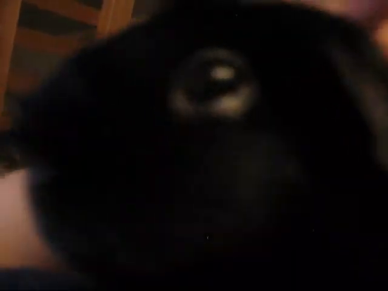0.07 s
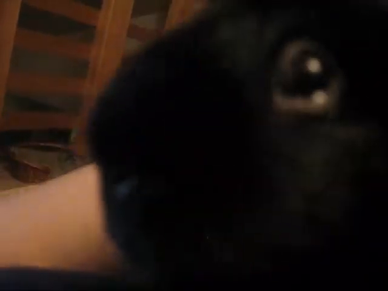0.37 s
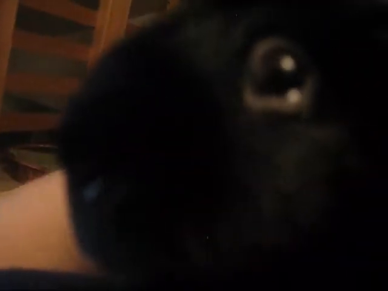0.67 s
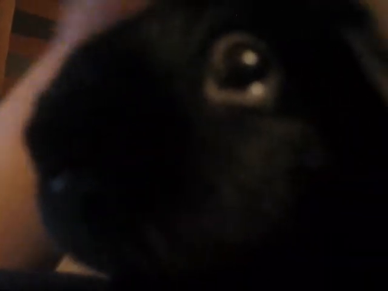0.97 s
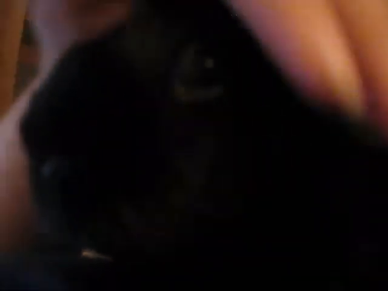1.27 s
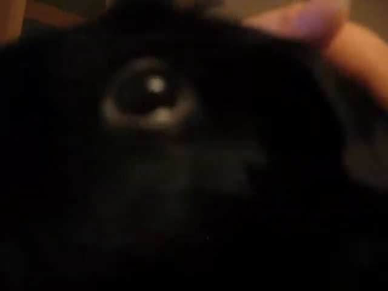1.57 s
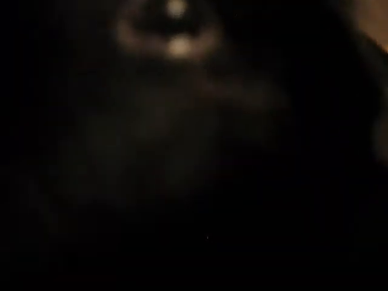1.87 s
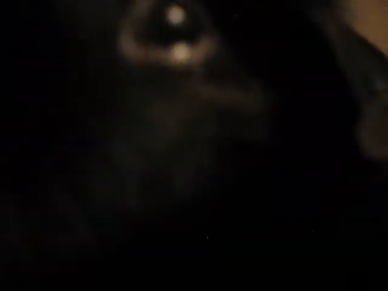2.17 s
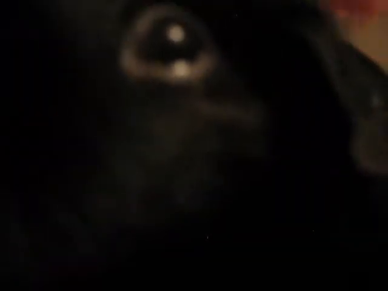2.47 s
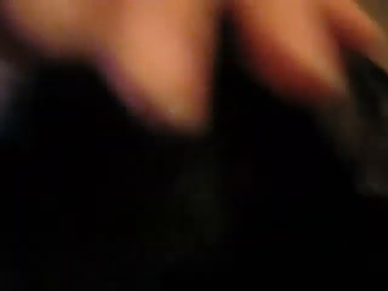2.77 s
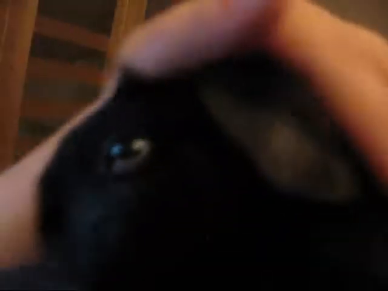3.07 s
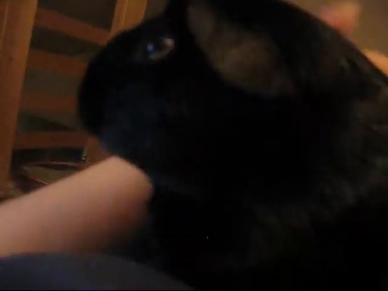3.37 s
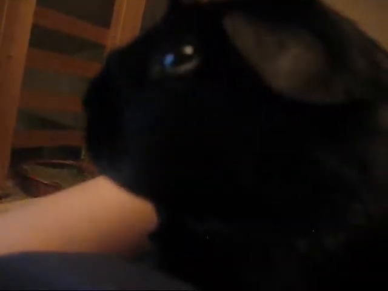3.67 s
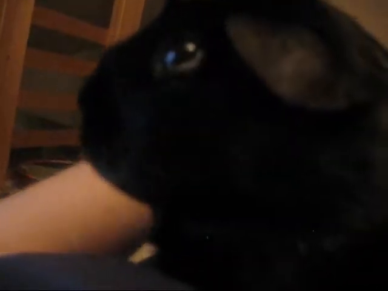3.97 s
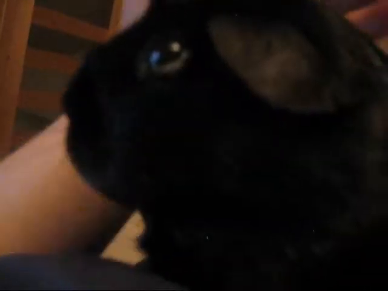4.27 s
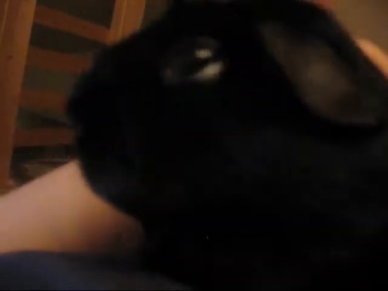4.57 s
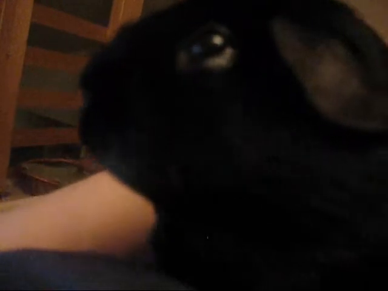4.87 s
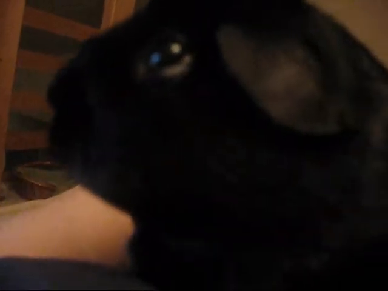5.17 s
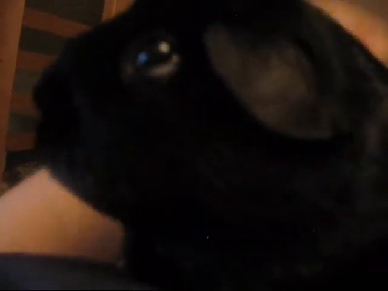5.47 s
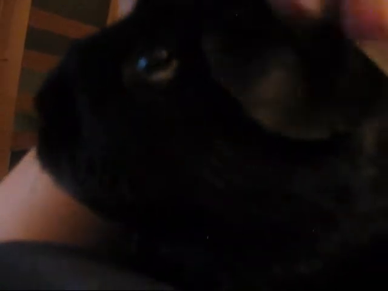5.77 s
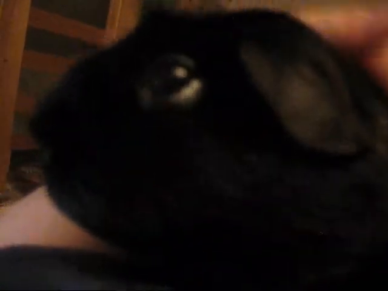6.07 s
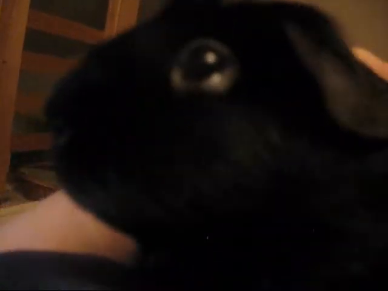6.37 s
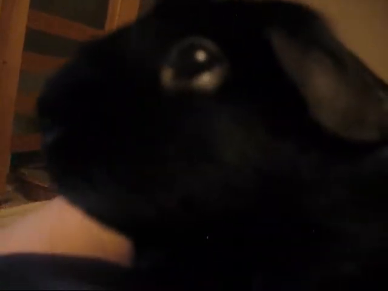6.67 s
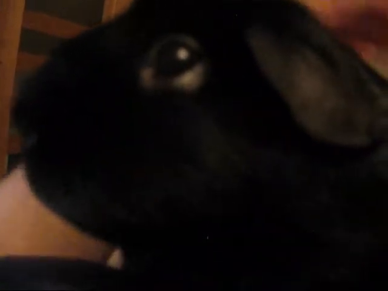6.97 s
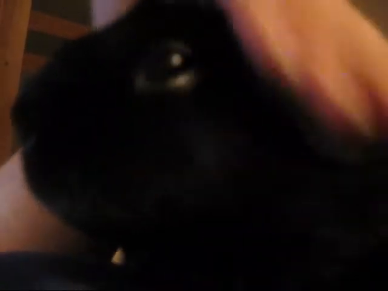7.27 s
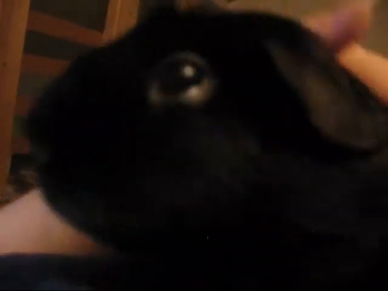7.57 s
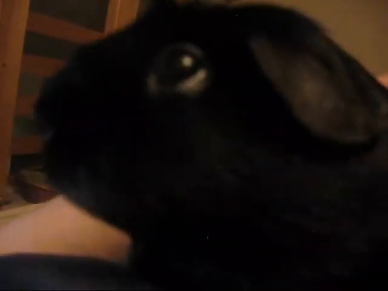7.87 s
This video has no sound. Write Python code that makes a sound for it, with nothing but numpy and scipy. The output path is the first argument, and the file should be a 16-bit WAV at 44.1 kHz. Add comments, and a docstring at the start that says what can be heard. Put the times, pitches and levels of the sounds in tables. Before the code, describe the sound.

In a quiet room, a small camera picks up a guinea pig close by, squeaking in brief bursts with pauses between them. Each squeak has a thin metallic sheen. Soft brushes of a hand on fur come and go, one small hard click sounds partway through, and faint motor whirrs and a slight cloth rustle follow. Microphone hiss and a faint whine run underneath.

```python
"""Guinea pig on a lap

A guinea pig chirps in short clusters close to a small camera while a hand strokes its fur.
Something hard clicks once, and an arm shifts on cloth. Under it all lie a quiet room, mains hum and
the camera's own hiss, whine and brief whirrs. The camera samples slowly and holds each sample,
which gives every chirp a thin metallic sheen."""
import sys
import numpy as np
from scipy import signal
from scipy.fft import rfft, irfft, next_fast_len
from scipy.io import wavfile
from scipy.ndimage import map_coordinates

SR = 44100
rng = np.random.default_rng(int(sys.argv[2]) if len(sys.argv) > 2 else 0)


def store_wav(level_fs):
    """Save 16-bit WAV to argv[1]."""
    pcm = np.round(np.clip(np.atleast_2d(level_fs), -1, 1) * 32767)
    wavfile.write(sys.argv[1], SR, pcm.T.astype(np.int16))


N = 358533

# Colour of the room and microphone hiss. Each row: frequency in Hz, relative level in dB.
HISS_EQ = [(20, -14.5), (120, -11), (300, -7.5), (670, -11), (1100, -10), (1450, -13), (2490, -16),
           (5400, -17.5)]
# Colour of the low rumble. Each row: frequency in Hz, relative level in dB.
RUMBLE_EQ = [(10, -3), (25, 3), (35, -19), (50, 2), (65, -14), (100, -12), (200, -40)]
# Mains hum and electronic whine. Each row: frequency in Hz, rms level in dB.
HUM_AND_WHINE = [(50, -61), (100, -66), (150, -64), (1077, -64), (2520, -62), (3145, -68), (3176, -66.5)]
# The hand sliding over fur. Each row: middle in seconds, length in seconds, level in dB.
FUR_STROKES = [(.01, 0.085, -42.5), (.55, 0.86, -51), (1.514, 0.3, -42.5), (2.966, 0.27, -45),
               (3.204, .18, -43.5), (5.969, 0.054, -42.5), (7.385, 0.12, -38.5), (7.6, 0.38, -49)]
# Colour of the fur. Each row: frequency in Hz, relative level in dB.
FUR_EQ = [(500, -7), (1500, -5), (2800, -6.5), (3500, -2), (4400, 1), (5500, -1)]
# The animal's calls. Each row: start in seconds, length in seconds, level in dB,
# mid-call pitch in Hz, even glide across the call in Hz, closing flick in Hz.
CALLS = [(0.0722, 0.012, -22, 957, 190, 0), (0.1295, 0.02, -21.5, 800, 143, 37),
         (0.191, 0.019, -22.5, 767, 40, 0), (1.559, 0.04, -18, 902, -1, 52),
         (1.6331, .029, -18.5, 830, 64, -39), (1.8863, .016, -29.5, 686, -12, 0),
         (3.1997, 0.016, -20.5, 976, 107, 0), (3.254, 0.015, -19.5, 792, -140, 0),
         (3.425, 0.013, -27, 536, 150, 0), (3.439, .062, -21, 824, 145, -110),
         (3.7996, .018, -25, 792, 100, -2), (3.88, 0.021, -30.5, 658, 95, 0),
         (4.889, 0.076, -23.5, 880, 144, 78), (4.993, .032, -22.5, 729, -105, 190),
         (5.07, 0.039, -21.5, 761, -175, 205), (5.3339, 0.016, -37.5, 700, 130, 0),
         (5.441, 0.026, -25, 716, 29, -60), (6.119, 0.027, -29.5, 756, 93, 0),
         (6.154, .018, -19.5, 950, 330, 50), (6.2126, .027, -19, 837, -4, 2),
         (6.439, 0.066, -18, 832, 6, 502), (6.542, 0.049, -19.5, 688, -160, 397),
         (6.648, 0.014, -34, 575, -45, 0), (7.437, .02, -27, 708, 160, 0), (7.509, 0.042, -23, 790, 205, 0),
         (7.5795, 0.054, -19.5, 749, 3, -125), (7.662, 0.019, -29, 470, -220, 0),
         (7.82, .019, -39.5, 605, 348, 0), (7.929, 0.057, -24, 682, 22, 472),
         (8.0213, 0.024, -26, 609, 85, 6)]
# The throat's resonance on the second harmonic. Each row: frequency in Hz, gain in dB.
THROAT_EQ = [(1100, 4.5), (1500, 0), (1700, 0), (1950, -2), (2400, -11)]
# Overtones against the fundamental, before each call shapes them.
# Each row: scene time in seconds, second harmonic in dB, third harmonic in dB.
OVERTONE_MIX = [(.1, -18.5, -26), (1.6, -19.5, -26), (3.2, -14.5, -27), (3.6, -10, -37),
                (6.3, -12.5, -31.5), (8, -10.5, -30)]
# The room's tail. Each row: frequency in Hz, time to fall 60 dB in seconds.
ROOM_DECAY = [(200, 0.42), (1000, 0.22), (5000, 0.033)]
# The click: its hit, a quick second hit, and a faint echo about 7 ms later. Each row: start in seconds, level
# in dB.
CLICK_ARRIVALS = [(3.5145, -3.5), (3.517, -18), (3.522, -22)]
# The hard object's ring. Each row: frequency in Hz, level in dB, time to fall 60 dB in seconds.
CLICK_RING = [(1230, -9.5, 0.013), (1790, -2.5, 0.017), (2320, -18, 0.0076), (4220, -11, 0.0041)]
# Whirrs, probably the focus motor. Each row: start in seconds, length in seconds, rms level in dB.
MOTOR_RUNS = [(3.6, .22, -56), (4.425, 0.14, -52.5), (4.545, 0.46, -47.5), (5.02, 0.2, -55),
              (5.425, .22, -52.5), (5.639, .17, -47), (5.956, 0.095, -49.5)]
# The motor housing's resonances. Each row: centre in Hz, width in Hz, relative level in dB.
HOUSING_MODES = [(1330, 69, -10.5), (1687, 38, -2), (2120, 70, -19)]
# The arm moving on cloth. Each row: middle in seconds, length in seconds, level in dB.
ARM_SHIFTS = [(6.61, 0.21, -51.5), (7.288, 0.39, -51.5)]
# Colour of the cloth. Each row: frequency in Hz, relative level in dB.
CLOTH_EQ = [(100, -15), (320, 2), (650, -4), (1100, -4), (2500, -22)]

ATTACK_S, RELEASE_S = 0.0062, 0.0077  # a call opens and closes fast
SAG_DB_PER_S, DULLING_DB_PER_S = 16, 66  # it weakens as it goes, the overtones faster
SCOOP_SHARE, SCOOP_S, FLICK_S = 0.053, 0.0039, 0.00935  # it starts flat and may flick at the end
QUAVER_HZ, QUAVER_SHARE_PER_S = 26.9, 0.33  # longer calls quaver more deeply
PURER_DB_PER_HZ = 0.04  # the further a call glides up, the weaker its second harmonic


def amp(db):
    """Decibels to gain."""
    return 10 ** (np.asarray(db) / 20)


def unit_rms(x):
    """Bring a signal to rms 1."""
    return x / np.sqrt(np.mean(x ** 2) + 1e-20)


def curve_at(points, hz):
    """Read a curve of (Hz, value) points on a log frequency axis."""
    freqs, values = np.transpose(points)
    return np.interp(np.log(hz + 1), np.log(freqs + 1), values)


def filtered(x, response):
    """Shape a signal with a gain that depends on frequency."""
    size = next_fast_len(N + SR // 2)
    return irfft(rfft(x, size) * response(np.fft.rfftfreq(size, 1 / SR)), size)[:N]


def noise(eq):
    """Noise coloured by an EQ curve, at rms 1."""
    return unit_rms(filtered(rng.standard_normal(N), lambda hz: amp(curve_at(eq, hz))))


def wobble(rate):
    """A smooth random curve with `rate` knots a second."""
    return map_coordinates(rng.standard_normal(int(N * rate / SR) + 4), [np.arange(N) * rate / SR])


def fade_in(progress):
    """A quarter-sine fade from 0 to 1."""
    return np.sin(np.pi / 2 * np.clip(progress, 0, 1))


def add(track, start_s, sound):
    """Mix a sound into the track at its cue."""
    start = max(round(start_s * SR), 0)
    track[start:start + len(sound)] += sound[:N - start]


def room_tone(hiss_db=-44, rumble_db=-59, drift_rad=0.3):
    """A bed of steady hiss and low rumble, with hum and whine that waver a little."""
    t = np.arange(N) / SR
    tones = sum(amp(db) * unit_rms(np.sin(2 * np.pi * hz * t + drift_rad * wobble(6)))
                for hz, db in HUM_AND_WHINE)
    return amp(hiss_db) * noise(HISS_EQ) + amp(rumble_db) * noise(RUMBLE_EQ) + tones


def fur_strokes(grain_db=1.5, steepness=4):
    """Hairs slip under the hand: a fine, grainy hiss that swells and fades with each stroke."""
    t = np.arange(N) / SR
    pressure = sum(amp(db) * np.exp(-np.abs(2 * (t - middle) / length) ** steepness)
                   for middle, length, db in FUR_STROKES)
    return pressure * unit_rms(noise(FUR_EQ) * amp(grain_db * wobble(280)))


def chirps(jitter=0.016, shimmer_db=0.62, fourth_vs_third_db=-13):
    """The vocal folds sing a nearly pure tone that scoops up to pitch, glides and may end in a flick."""
    out = np.zeros(N)
    waver = 1 + jitter * wobble(260)
    flutter = amp(shimmer_db * wobble(150))
    times, second_dbs, third_dbs = np.transpose(OVERTONE_MIX)
    for start, length, db, pitch, glide, flick in CALLS:
        t = np.arange(int(length * SR)) / SR
        span = round(start * SR) + np.arange(len(t))
        contour = pitch + glide * (t / length - .5) + flick * np.exp((t - length) / FLICK_S)
        scoop = SCOOP_SHARE * np.exp(-t / SCOOP_S)
        quaver = QUAVER_SHARE_PER_S * length * np.cos(2 * np.pi * QUAVER_HZ * t)
        hz = contour * (1 - scoop - quaver)
        phase = 2 * np.pi * np.cumsum(hz * waver[span]) / SR
        second_db = np.interp(start, times, second_dbs) - PURER_DB_PER_HZ * max(glide, 0)
        third_db = np.interp(start, times, third_dbs)
        # the second harmonic swells and fades as it glides through the throat's resonance
        second = amp(second_db + curve_at(THROAT_EQ, 2 * hz)) * np.sin(2 * phase)
        upper = amp(third_db) * (np.sin(3 * phase) + amp(fourth_vs_third_db) * np.sin(4 * phase))
        voicing = fade_in(t / ATTACK_S) * fade_in((length - t) / RELEASE_S)
        effort = amp(db - SAG_DB_PER_S * (t - length / 2)) * voicing * flutter[span]
        # the folds swing almost as a pure sine while they start and stop
        brightness = voicing * amp(-DULLING_DB_PER_S * (t - length / 2))
        add(out, start, effort * (np.sin(phase) + brightness * (second + upper)))
    return out


def room_reverb(x, predelay_s=0.00516):
    """A furnished room answers with a short tail, the treble dying first."""
    hz, t, spectrum = signal.stft(rng.standard_normal(SR // 2), SR, nperseg=256)
    decay = amp(-60 * t / curve_at(ROOM_DECAY, hz)[:, None])
    tail = signal.istft(spectrum * decay, SR, nperseg=256)[1]
    delayed = np.pad(x, (int(predelay_s * SR), 0))
    return signal.fftconvolve(delayed, tail / np.linalg.norm(tail))[:N]


def click(crack_db=-20, crack_t60_s=0.012, attack_s=0.00029):
    """A hard little contact chatters and rings for a few milliseconds, and a faint echo follows."""
    out = np.zeros(N)
    t = np.arange(SR // 20) / SR
    ring = sum(amp(db - 60 * t / t60) * np.sin(2 * np.pi * hz * t) for hz, db, t60 in CLICK_RING)
    for start, db in CLICK_ARRIVALS:
        crack = amp(crack_db - 60 * t / crack_t60_s) * rng.standard_normal(len(t))
        add(out, start, amp(db) * fade_in(t / attack_s) * (ring + crack))
    return out


def motor_housing(hz):
    """The housing's response: three narrow resonances of alternating polarity."""
    return sum((-1) ** k * amp(db) * 1j * hz * width / (centre ** 2 - hz ** 2 + 1j * hz * width)
               for k, (centre, width, db) in enumerate(HOUSING_MODES))


def motor_whirr(fade_s=.015):
    """A tiny motor runs in bursts; its rough drive rings the housing."""
    t = np.arange(N) / SR
    running = sum(amp(db) * np.clip(np.minimum(t - start, start + length - t) / fade_s + .5, 0, 1)
                  for start, length, db in MOTOR_RUNS)
    return running * unit_rms(filtered(rng.standard_normal(N), motor_housing))


def cloth_rustle():
    """The arm shifts on clothing with a soft, dull rustle."""
    t = np.arange(N) / SR
    movement = sum(amp(db) * np.exp(-(2 * (t - middle) / length) ** 2)
                   for middle, length, db in ARM_SHIFTS)
    return movement * noise(CLOTH_EQ)


def scene(reverb_db=-25):
    """The mono mix: chirps and click sit up close, with just a touch of room, over the quiet layers."""
    close = chirps() + click()
    reverb = amp(reverb_db) * room_reverb(close)
    return (close + reverb + fur_strokes() + cloth_rustle() + motor_whirr() + room_tone())[None]


def gain_control(x, threshold_db=-13, cut_db_per_db=0.25, release_s=0.5):
    """A peak over the threshold ducks the gain a little; it creeps back."""
    excess_db = np.maximum(20 * np.log10(np.abs(x) + 1e-9) - threshold_db, 0)
    release = np.exp(-np.arange(N) / SR / release_s)
    held_db = np.maximum.accumulate(excess_db / release) * release
    smoothing = np.ones(SR // 100) / (SR // 100)  # 10 ms attack
    return x * amp(-cut_db_per_db * signal.lfilter(smoothing, 1, held_db))


def record(dry, hold_samples=4, high_cut_hz=15650):
    """The camera samples at a quarter rate and holds each value, mirroring the low band into the top."""
    low_band = filtered(gain_control(dry[0]), lambda hz: hz < SR / hold_samples / 2)
    steps = np.repeat(low_band[::hold_samples], hold_samples)[:N]
    return filtered(steps, lambda hz: hz < high_cut_hz)[None]


dry = scene()
out = record(dry)
store_wav(out)
```